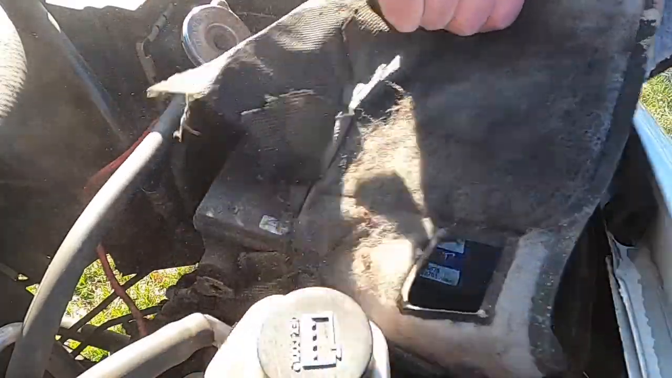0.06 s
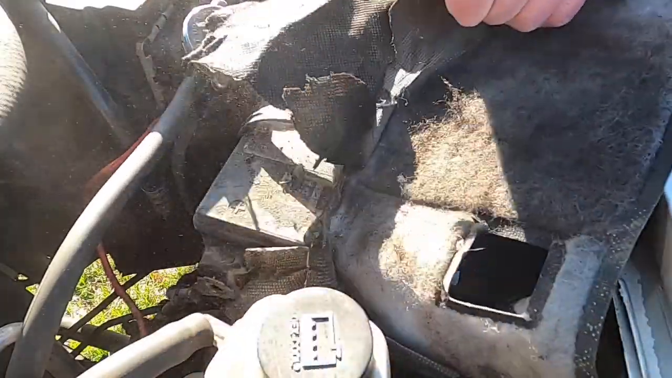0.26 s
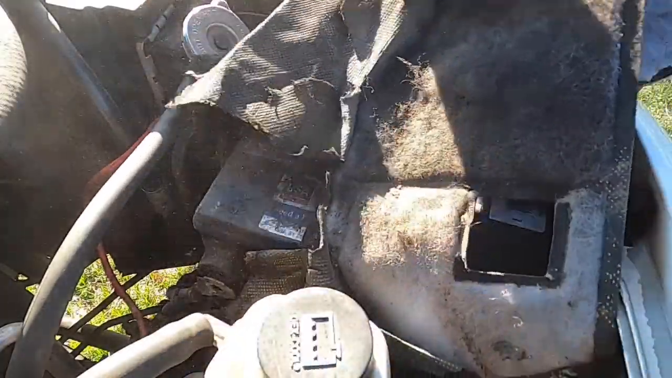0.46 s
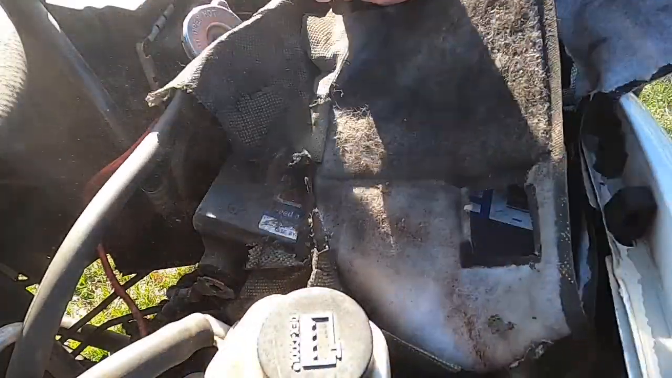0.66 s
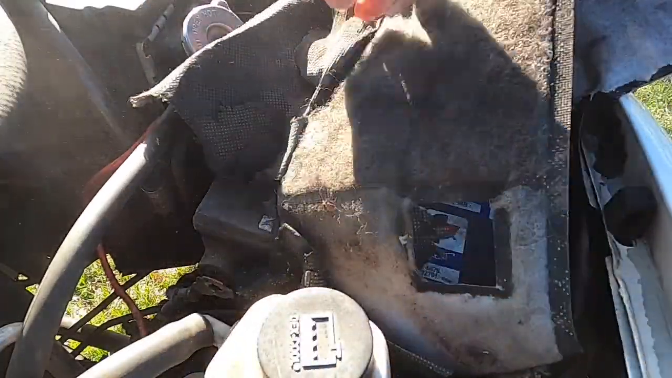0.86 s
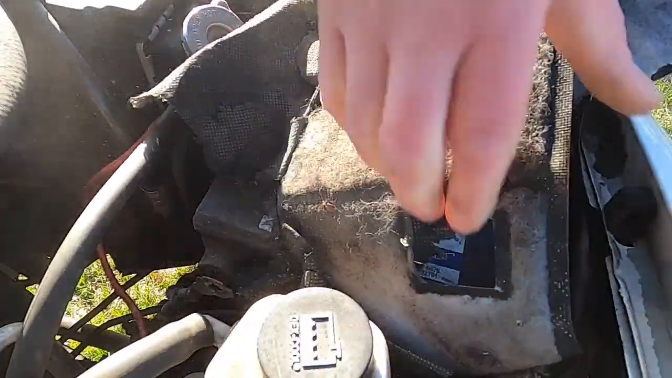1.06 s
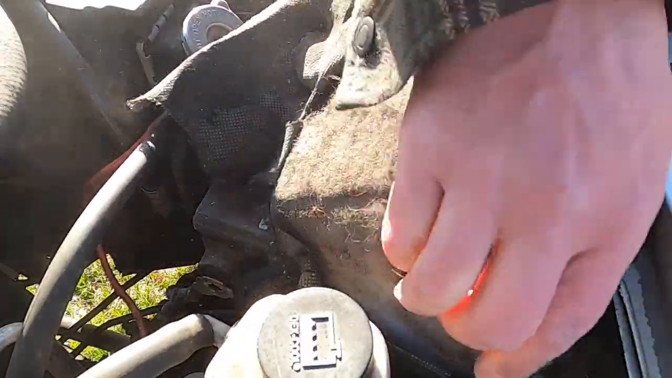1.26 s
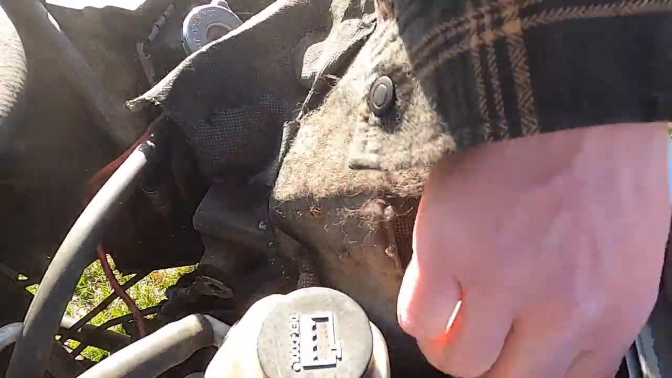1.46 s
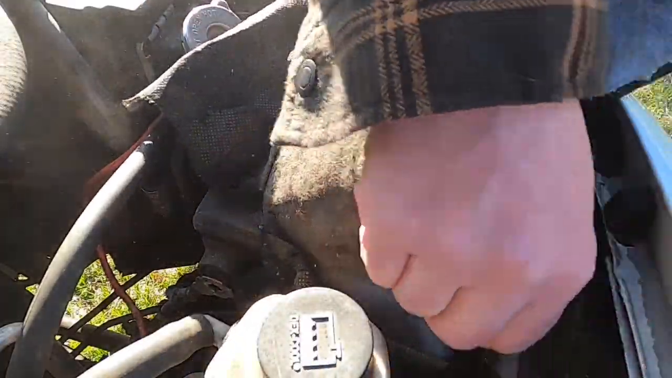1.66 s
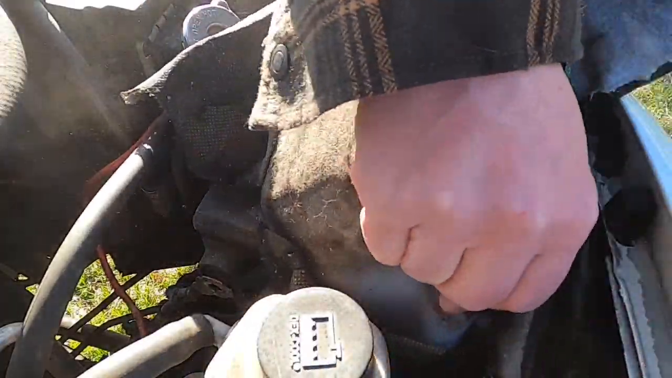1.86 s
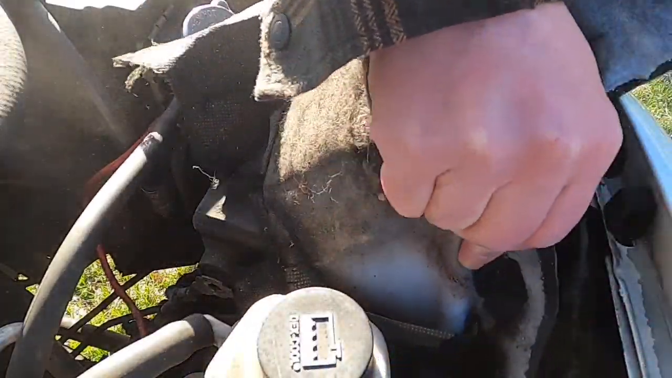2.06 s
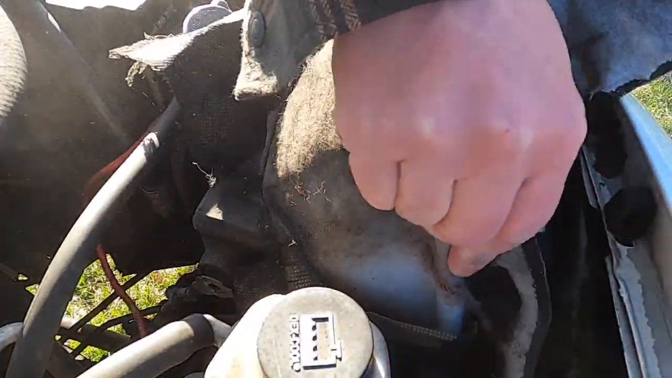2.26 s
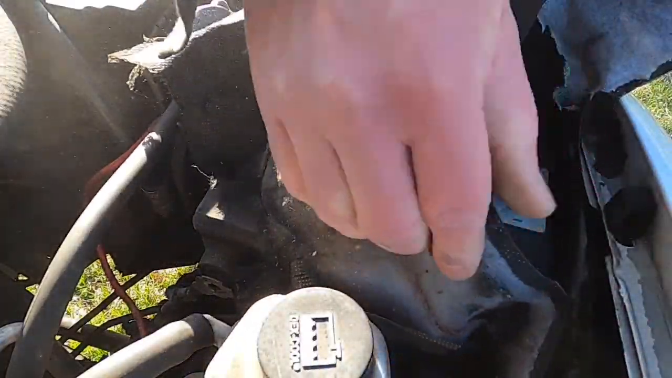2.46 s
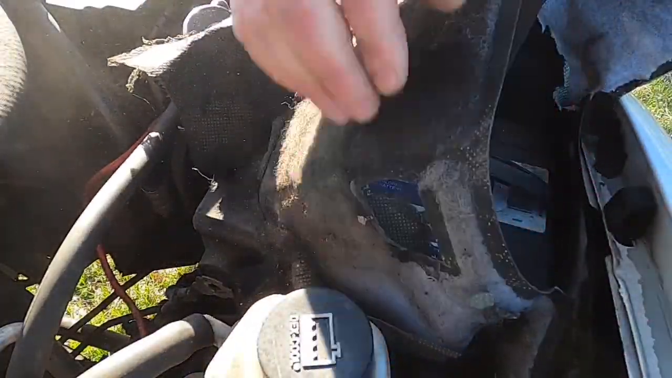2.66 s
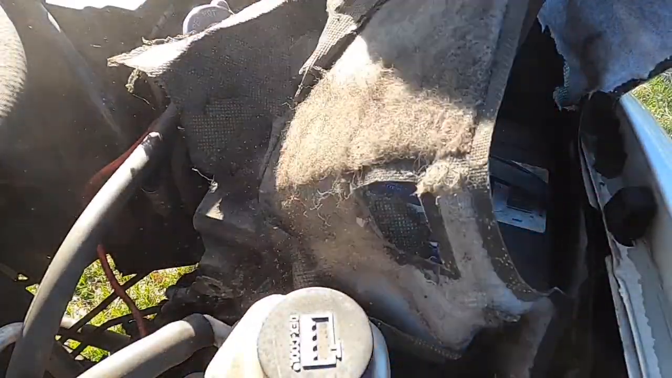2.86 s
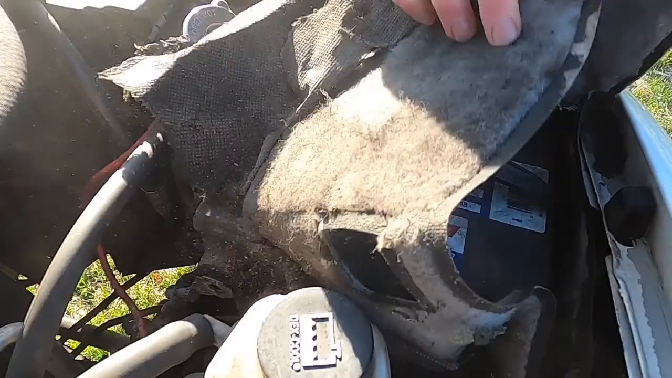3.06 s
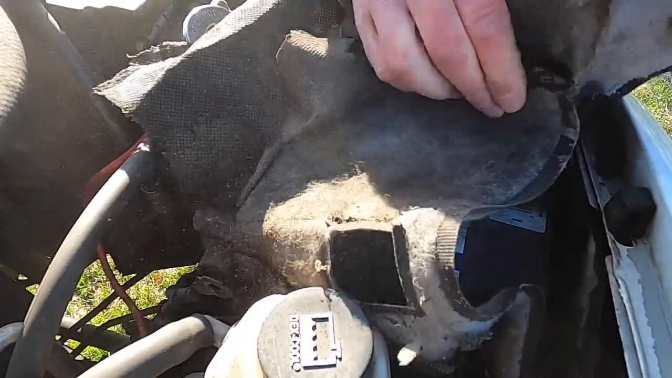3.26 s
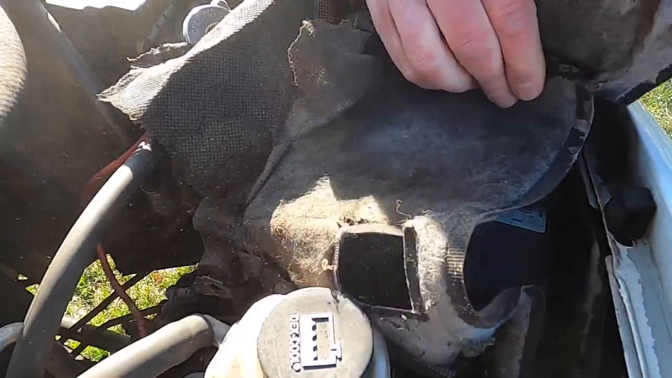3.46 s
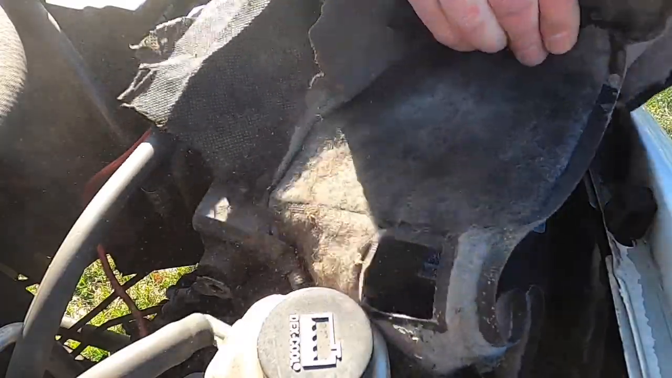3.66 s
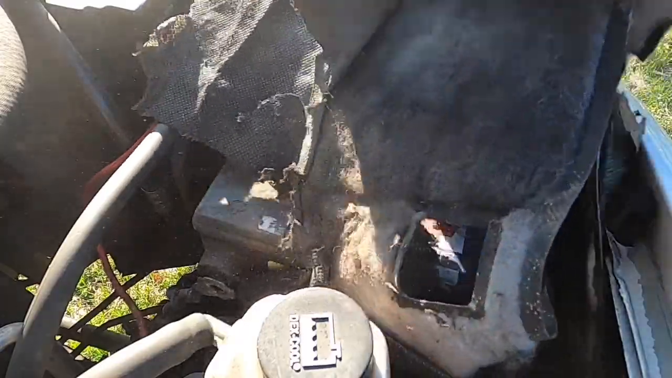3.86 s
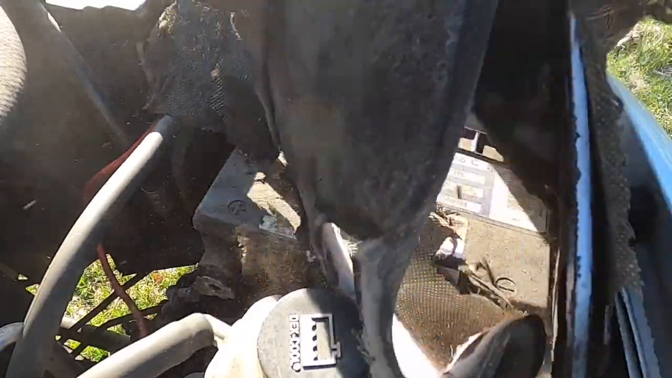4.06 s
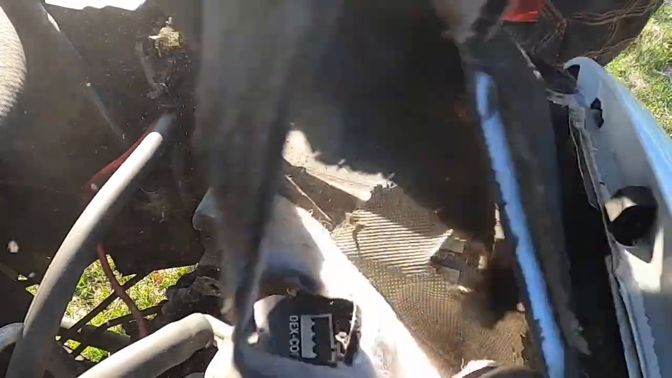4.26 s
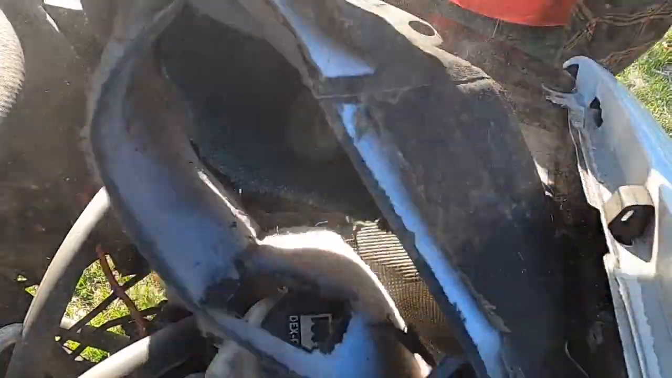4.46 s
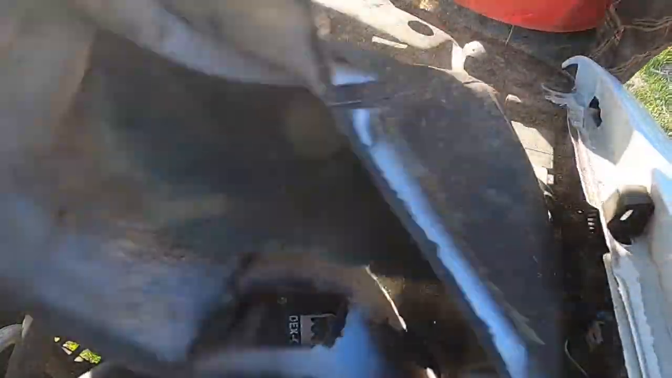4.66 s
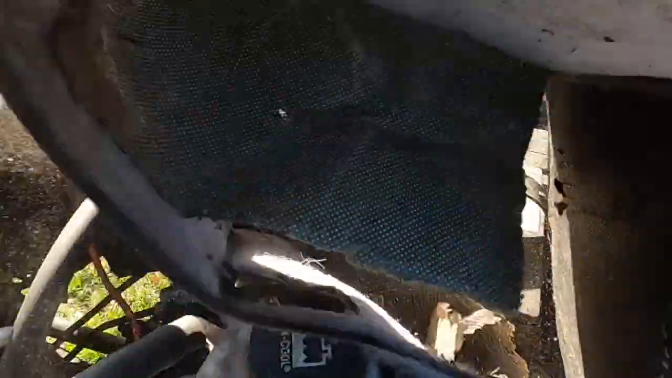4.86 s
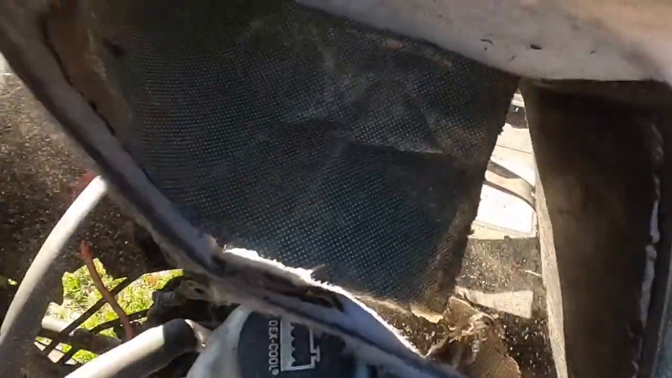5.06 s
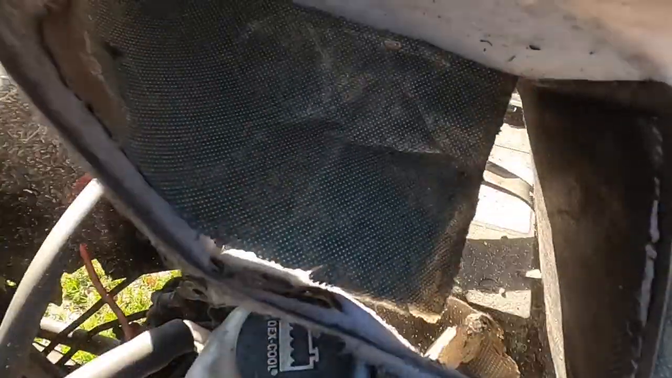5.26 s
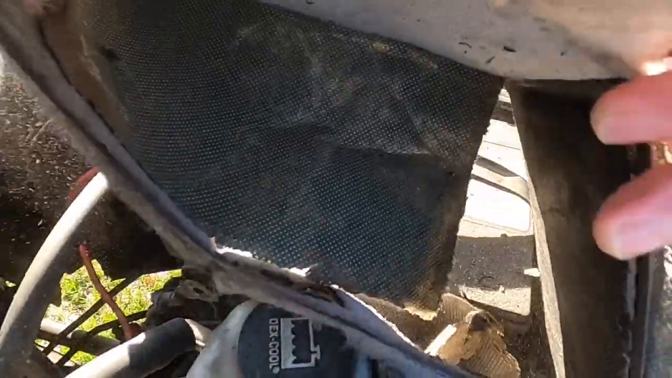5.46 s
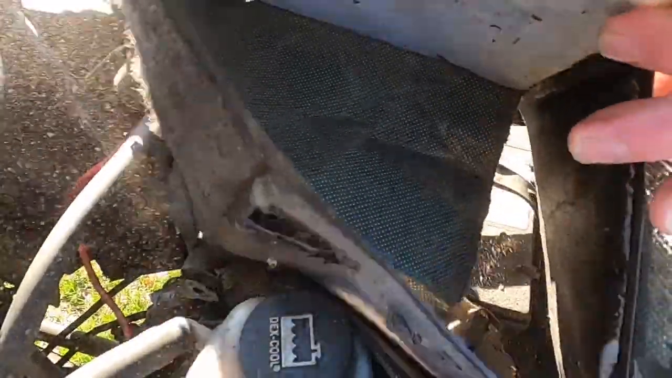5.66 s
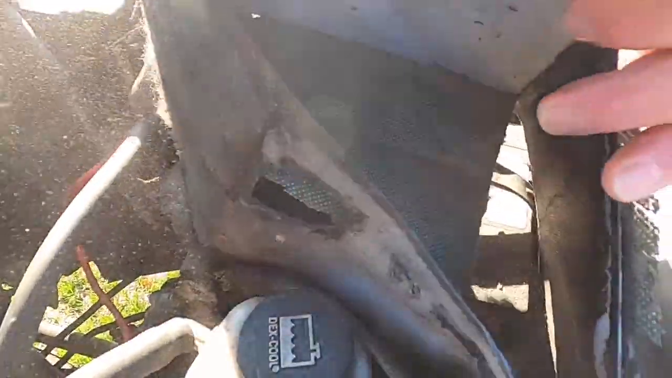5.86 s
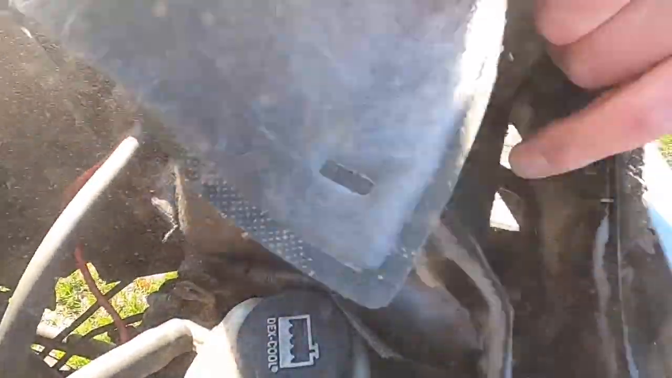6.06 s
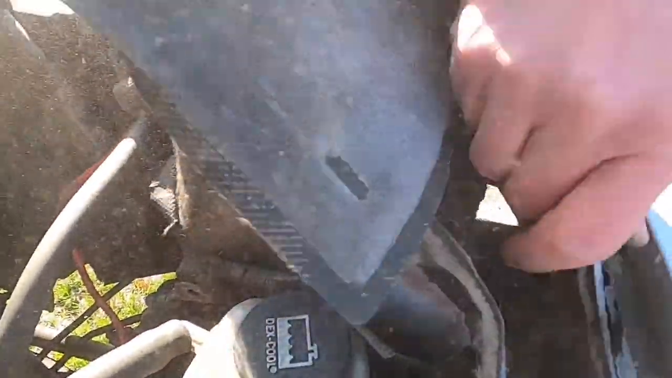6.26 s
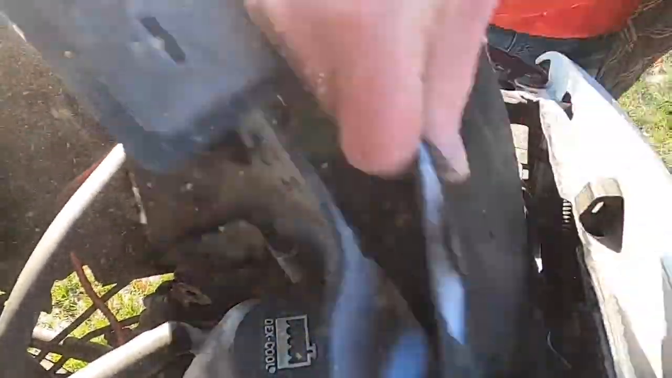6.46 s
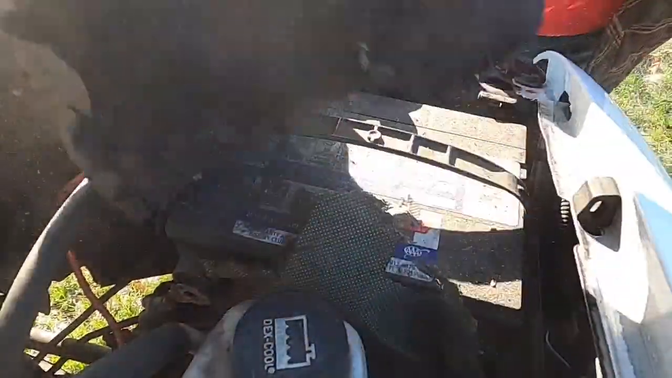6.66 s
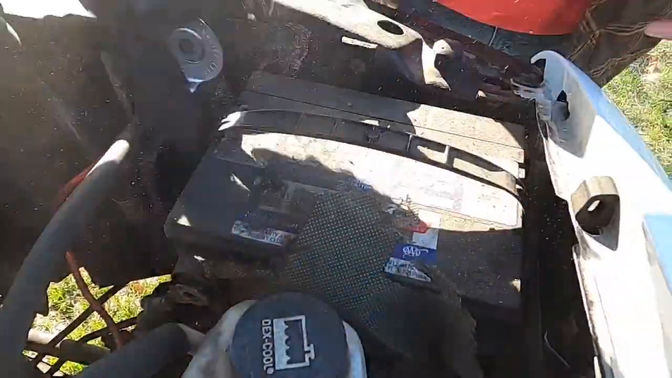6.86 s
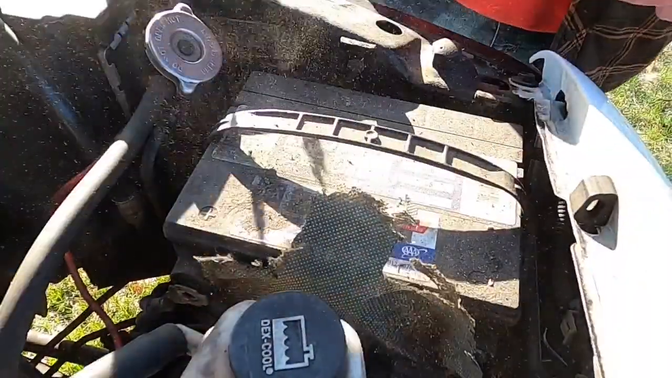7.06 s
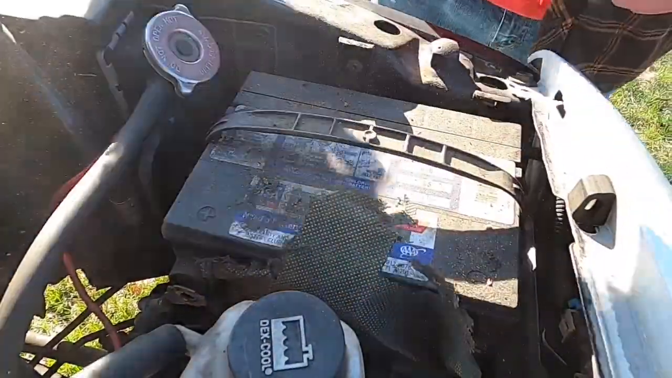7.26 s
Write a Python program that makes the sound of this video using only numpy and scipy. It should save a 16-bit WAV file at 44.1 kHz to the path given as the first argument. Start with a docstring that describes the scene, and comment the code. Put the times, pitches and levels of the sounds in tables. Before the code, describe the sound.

A stiff felt cover is tugged off a car battery by hand, outdoors and close to the microphone. It starts with a dry scrape, a knock and a sharp snap at 0.2 seconds, then uneven rasping with light knocks. From 1 to 3 seconds the rubbing is softer, dotted with snapping threads. A dull knock comes at 3.3 seconds, and around 4 seconds a loud rip with a short creak and more snaps. The loudest moment is near 4.9 seconds: deep thumps jolt the microphone, followed by quick hollow knocks on the battery case and low rumble until about 5.3 seconds. The sound then narrows from stereo to nearly mono. Further scrapes and bumps come around 6.1 seconds, and a last strong rasp at 6.6 ends in a light knock. Faint wind and hiss lie underneath, with a barely audible distant bird whistling near 2.8, 5.3 and 7.3 seconds.

```python
"""Fibres scrape and snap as a stiff felt cover is tugged and torn off a car battery by hand, outdoors.
Stick-slip friction makes the felt rasp and creak and drives the modes of the case; impacts on the case
and on the mount of a small stereo microphone close by add knocks and low pushes. A far bird whistles
over a faint hiss and a little wind. After the loudest knocks, near 5 s, the recorder falls back to
almost one channel."""
import sys
import numpy as np
from scipy import signal
from scipy.io import wavfile

SR = 44100
rng = np.random.default_rng(int(sys.argv[2]) if len(sys.argv) > 2 else 0)


def unload_wav(signal):
    """Save mono or channel-first audio to the path in sys.argv[1] as 16-bit WAV at rate SR, clipped to [-1, 1]."""
    wavfile.write(
        sys.argv[1],
        SR,
        np.round(np.clip(np.atleast_2d(signal).T, -1, 1) * 32767).astype(np.int16),
    )


N = 322371


def amp(db):
    """Amplitude ratio of a level in dB."""
    return 10 ** (np.asarray(db) / 20)


def unit_rms(x):
    """Normalisation to rms 1."""
    return x / np.sqrt(np.mean(x ** 2) + 1e-20)


def in_time(curve):
    """Linear interpolation of a curve at every sample."""
    return np.interp(np.arange(N) / SR, *np.transpose(curve))


def at_hz(spectrum, hz):
    """Interpolation on a logarithmic frequency axis."""
    freqs, values = np.transpose(spectrum)
    return np.interp(np.log(hz), np.log(freqs), values)


def drift(corner_hz):
    """Slow random modulation: low-passed noise of rms 1."""
    r = np.exp(-80 * np.pi * corner_hz / SR)   # one step per 40 samples
    slow = signal.lfilter([1], [1, -2 * r, r * r], rng.standard_normal(N // 40 + 2002))[2000:]
    return np.interp(np.arange(N) / 40, np.arange(len(slow)), unit_rms(slow))


def ring(force, hz, t60):
    """Damped resonator: a unit impulse excites a decaying sine of amplitude 1."""
    r, w = amp(-60 / (t60 * SR)), 2 * np.pi * hz / SR
    return signal.lfilter([0, np.sin(w)], [1, -2 * r * np.cos(w), r * r], force + 1e-18)


# Likeness of the two microphone ports: f/Hz, correlation
CORRELATION = [(30, 0.27), (100, 0.86), (400, 0.97), (1500, 0.73), (4000, 0.96), (8000, 0.19),
               (15000, 0.58)]
# Left port over right: f/Hz, level/dB
IMBALANCE = [(60, 1), (180, -1.5), (550, -2.5), (1650, 0), (4970, -2), (15000, -4)]
def ports(common, opposed, hz):
    """Partial coherence: an in-phase and an antiphase signal near hz mix into left and right."""
    alike, left_db = np.clip(at_hz(CORRELATION, hz), 0, 1), at_hz(IMBALANCE, hz) / 2
    pair = np.sqrt((1 + alike) / 2) * common + np.sqrt((1 - alike) / 2) * opposed * [[1], [-1]]
    return amp([[left_db], [-left_db]]) * pair


def band_noise(spectrum, contact, patchy_db):
    """Amplitude modulation: noise times a contact gain, in fluctuating quarter-octave bands; rms 1."""
    low_hz, top_hz = spectrum[0][0], min(spectrum[-1][0], .45 * SR)
    edges = np.geomspace(low_hz, top_hz, int(np.log2(top_hz / low_hz) * 4) + 2)
    out, together = 0, drift(28)
    white = contact * rng.standard_normal((2, 2, N))
    for k, (low, high) in enumerate(zip(edges, edges[1:])):
        hz = np.sqrt(low * high)
        band = signal.sosfilt(signal.butter(2, [low, high], "band", fs=SR, output="sos"), white[k % 2])
        flicker_db = patchy_db * (.5 * together + drift(13.6))
        out = out + amp(at_hz(spectrum, hz) + flicker_db) * ports(*band, hz)
    return unit_rms(out)


def slips(per_s, spread_db, decay_s):
    """Stick-slip friction as a gain: random, exponentially decaying bursts over a steady rub."""
    sizes = amp(spread_db * np.minimum(rng.exponential(1, N), 4))
    slipping = rng.random(N) < per_s / SR
    r = np.exp(-1 / (decay_s * SR))
    return 1 + signal.lfilter([1], [1, -r], sizes * slipping)


# Pulls of the hand: start of hold t/s, swell/s, hold/s, fade/s, level/dB of fibre, felt, rumble, drone
PULLS = [(0.109, 0.42, 0.15, 0.13, -37, -39, -42.5, -46), (0.422, 0.046, 0.31, 0.061, -44.5, -48, -64, -48),
         (0.859, 0.17, 0.1, 0.045, -42.5, -48, -50, -51), (1.31, 0.1, 0.029, 0.065, -51, -51, -47.5, -62),
         (1.549, 0.027, 0.2, 0.5, -53.5, -54, -53, -68), (2.036, 0.8, 0.2, 0.12, -43, -53.5, -60.5, -57),
         (2.395, 0.057, 0.067, 0.13, -44.5, -50.5, -57, -54),
         (2.639, 0.13, 0.015, 0.076, -48.5, -59.5, -53.5, -66),
         (3.08, 0.14, 0.12, 0.75, -47.5, -59, -52.5, -53.5),
         (3.236, 0.22, 0.17, 0.2, -43, -44.5, -40.5, -56),
         (3.598, 0.16, 0.22, 0.067, -42.5, -46.5, -54.5, -50),
         (3.895, 0.1, 0.2, 0.04, -28, -30.5, -29, -33.5),
         (4.12, 0.059, 0.045, 0.089, -46.5, -45.5, -34.5, -44),
         (4.307, 0.08, 0.2, 0.38, -50, -51, -50, -56.5), (4.651, 0.13, 0.02, 0.11, -41.5, -46, -45, -71.5),
         (4.812, 0.62, 0.014, 0.33, -42, -54, -44.5, -62.5),
         (4.868, 0.068, 0.014, 0.038, -31.5, -39, -25, -31.5),
         (4.947, .1, 0.024, 0.48, -57.5, -50.5, -34, -35.5),
         (5.049, 0.11, 0.27, 0.03, -82.5, -68.5, -27.5, -57),
         (5.512, 0.04, 0.029, 0.066, -62, -67, -49.5, -64),
         (5.629, .02, 0.19, 0.25, -52.5, -57.5, -43, -58.5),
         (5.997, 0.087, 0.1, 0.16, -45.5, -42.5, -39, -46), (6.158, 0.13, 0.074, 0.054, -49, -50, -44, -42),
         (6.343, 0.17, 0.13, 0.12, -54.5, -55.5, -53, -55.5),
         (6.561, 0.13, 0.086, 0.012, -34.5, -44.5, -44, -36.5),
         (6.656, 0.087, 0.063, 0.19, -48, -52, -42, -42.5),
         (6.908, 0.082, 0.17, 0.021, -65.5, -75.5, -61.5, -74.5)]
# Bulge in the middle of a hold: level/dB of fibre, felt, rumble, drone
BULGE = (3.38, 5.1, 1.7, 4.4)
def tugs():
    """Incoherent sources add in power: overlapping tugs give the gains of the four rubbing sounds."""
    t, power = np.arange(0, N + 64, 64) / SR, 0
    for s, swell_s, hold_s, fade_s, *levels_db in PULLS:
        drop_db = 20 * (np.maximum(s - t, 0) / swell_s + np.maximum(t - s - hold_s, 0) / fade_s)
        arch = np.sin(np.pi * np.clip((t - s) / hold_s, 0, 1))
        power = power + (amp(levels_db)[:, None] * amp(np.outer(BULGE, arch) - drop_db)) ** 2
    return [np.interp(np.arange(N) / SR, t, np.sqrt(p)) for p in power]


# Spectral density of scraping fibres: f/Hz, relative level/dB
FIBRE_SPECTRUM = [(600, -15.5), (850, -1), (1120, 1.5), (2500, 0.5), (4100, 0.5), (5000, -4), (6500, -7.5),
                  (8500, -15), (12000, -22), (15900, -30.5)]
def fibre_scrape():
    """Friction noise: brief slips of the fibres make a bright rasp."""
    return band_noise(FIBRE_SPECTRUM, slips(110, spread_db=1.7, decay_s=.0012), patchy_db=1.2)


# Spectral density of felt on the case: f/Hz, relative level/dB
FELT_SPECTRUM = [(94, -23), (160, -4.5), (280, -5), (333, -9), (659, -9), (1600, -20.5), (2080, -41)]
def felt_rub():
    """Friction noise: denser, longer slips of felt on the case make a dull rub."""
    return band_noise(FELT_SPECTRUM, slips(200, spread_db=1.5, decay_s=.003), patchy_db=1.5)


# Spectral density of the handling rumble: f/Hz, relative level/dB
RUMBLE_SPECTRUM = [(12, -18.5), (30, -6), (83, 2.5), (200, -6.5), (340, -20.5)]
def hand_rumble():
    """Handling noise: the tugs make a low, strongly fluctuating rumble."""
    return band_noise(RUMBLE_SPECTRUM, contact=1, patchy_db=6)


# Modes of the battery case: f/Hz, relative level/dB, T60/s
CASE_MODES = [(182, -21.5, 0.071), (225, -10.5, 0.15), (355, 3, 0.055), (422, 8.5, 0.024),
              (507, 4.5, 0.023), (710, -1.5, 0.088), (826, 0.5, 0.11), (983, -2.5, 0.08), (1133, -4, 0.071)]
def case_drone():
    """Forced vibration: rough rubbing sustains the low modes of the case, each swelling alone."""
    rub = slips(60, spread_db=2.5, decay_s=.018) * rng.standard_normal((2, N))
    return unit_rms(sum(amp(db + 2 * drift(4.6)) * ports(*ring(rub, hz, t60), hz) / np.sqrt(t60)
                        for hz, db, t60 in CASE_MODES if hz < 600))


# Spectral density of the outdoor hiss: f/Hz, relative level/dB
HISS_SPECTRUM = [(170, 15), (250, 0.5), (450, -1.5), (830, -12.5), (1170, 2.5), (1500, -4.5), (3000, -5.5),
                 (8500, -14), (9500, -24.5), (15500, -40)]
# Course of the hiss: t/s, level/dB
HISS_LEVEL = [(0, -60), (4.9, -70), (5.15, -69), (5.6, -59.5), (6.9, -59), (7.1, -75)]
def air_hiss():
    """Masking: a faint broadband background emerges in the pauses."""
    return amp(in_time(HISS_LEVEL)) * band_noise(HISS_SPECTRUM, contact=1, patchy_db=1.5)


# Threads and seams that let go: t/s, peak level/dB, centre f/Hz, T60/s
BREAKS = [(0.033, -16, 4200, 0.016), (0.2126, -9.5, 3720, 0.022), (0.6395, -19.5, 3170, 0.089),
          (0.958, -24.5, 3720, 0.009), (1.0904, -38, 2640, 0.044), (1.283, -27.5, 4500, 0.0083),
          (1.313, -41, 2900, 0.053), (1.327, -43, 2500, 0.017), (1.394, -37, 2950, 0.064),
          (1.411, -34, 3800, 0.016), (1.5288, -41, 1840, 0.043), (1.768, -27.5, 3180, 0.12),
          (1.8336, -29.5, 4970, 0.029), (2.0522, -31, 1900, 0.035), (2.097, -21, 4500, .012),
          (2.121, -20.5, 4400, 0.12), (2.1372, -15, 4560, 0.012), (2.225, -27, 3640, 0.018),
          (2.703, -39.5, 2720, 0.034), (2.7697, -45, 3570, 0.02), (3.146, -23.5, 3960, 0.02),
          (3.25, -21.5, 3400, 0.033), (3.327, -22, 3560, 0.016), (3.8579, -13, 3380, 0.018),
          (4.1214, -12.5, 4730, 0.03), (4.311, -25, 3200, 0.12), (4.324, -24, 3200, 0.08),
          (4.339, -17, 2300, 0.057), (4.5025, -24.5, 2940, 0.094), (4.904, -13, 2480, 0.023),
          (5.0128, -25, 2980, 0.033), (5.113, -26, 4400, 0.048), (5.1826, -31.5, 2300, 0.021),
          (5.228, -41, 2600, 0.014), (5.2783, -30, 2400, 0.027), (5.349, -42.5, 2500, 0.043),
          (5.64, -35.5, 1780, .03), (6.11, -29.5, 2770, 0.051), (6.217, -30, 3280, 0.019),
          (6.785, -32.5, 2620, 0.037), (6.992, -40.5, 2280, 0.027)]
def snaps():
    """Sudden release of tension: a tick and a dying noise burst briefly ring the stiff backing."""
    n = 4000
    out, t = np.zeros((2, N + n)), np.arange(n) / SR
    noise = rng.standard_normal((len(BREAKS), 2, n))
    mode_octaves = .8 * rng.uniform(-.33, 1, (len(BREAKS), 4))
    tick = 6 * (t == 0) * [[1], [0]]
    for (s, db, hz, t60), burst, octaves in zip(BREAKS, noise, mode_octaves):
        band = signal.butter(3, [hz * .26, min(hz * 1.92, 9000)], "band", fs=SR, output="sos")
        crack = signal.sosfilt(band, burst * amp(-60 * t / t60) + tick)
        backing = sum(ring(crack, hz * 2 ** octave, t60=.01) for octave in octaves)
        snap = ports(*(crack + amp(-33) * backing), hz)
        out[:, round(s * SR):][:, :n] += amp(db) * snap / np.abs(snap).max()
    return out[:, :N]


def mount_push(t, db):
    """Structure-borne sound: a low, damped swing sags in pitch and reaches the ports out of phase."""
    rest_hz, extra_hz, sag_s, t60, delay_s = 38.6, 112.3, .0065, .061, .0027
    age = np.maximum(t - delay_s, 0)
    phase = 2 * np.pi * (rest_hz * age + extra_hz * sag_s * (1 - np.exp(-age / sag_s)))
    lead_rad = np.array([[.5], [-.5]]) * np.minimum(rest_hz * age * 4, 1)
    return -amp(db - 60 * age / t60) * np.sin(phase + lead_rad) * amp([[1.5], [-1.5]])


# Blows on case and mount: t/s, case peak level/dB, push level/dB, hardness/(dB per octave)
BLOWS = [(0.1, -18, -52, 0), (0.214, -35, -21.5, -9), (0.747, -25, -31.5, -9), (0.961, -26, -47, -11),
         (1.426, -35.5, -64, -7.5), (1.831, -29, -43, -16), (2.906, -49, -68, -6),
         (3.29, -17.5, -24.5, -11.5), (3.856, -18, -27, 28), (3.881, -17, -36, -9), (4.795, -49, -19.5, -5),
         (4.881, -49, -8, 3.5), (4.903, -7.5, -2, -10), (4.947, -12, -39, 1), (5.011, -11, -24, 6),
         (5.023, -11.5, -36, 1.5), (5.055, -16, -24, -15), (5.112, -15, -26, 2), (5.184, -20.5, -13, -4),
         (5.216, -25.5, -24, 4), (5.639, -37, -42, -6), (5.793, -34, -42, -2), (5.819, -33, -45, -2),
         (6.121, -27, -29, -6), (6.188, -25, -19.5, -17), (6.216, -24, -85, -7), (6.779, -26.5, -32.5, 3.5)]
def knocks():
    """Impact excitation: each blow rattles the case modes and pushes the mount; harder is brighter."""
    n, grip = 8000, .5   # the felt shortens the ring of the case to this share
    out, t = np.zeros((2, N + n)), np.arange(n) / SR
    rattle = rng.standard_normal((len(BLOWS), 2, n)) * (np.exp(-t / .0046) + .26 * np.exp(-t / .018))
    scatter_db = 2 * rng.standard_normal((len(BLOWS), len(CASE_MODES)))
    detune = 1 + .035 * rng.standard_normal(scatter_db.shape)   # the grip bends the pitches
    contacts = signal.sosfilt(signal.butter(2, 1500, fs=SR, output="sos"), rattle)   # felt cushioning
    for k, (s, db, push_db, hardness) in enumerate(BLOWS):
        body = 0
        for (hz, mode_db, t60), chance_db, bend in zip(CASE_MODES, scatter_db[k], detune[k]):
            gain = amp(mode_db + chance_db + hardness * np.log2(hz / 500))
            body = body + gain * ports(*ring(contacts[k], hz * bend, t60 * grip), hz)
        out[:, round(s * SR):][:, :n] += amp(db) * body / np.abs(body).max() + mount_push(t, push_db)
    return out[:, :N]


# Spectral density of wind on the ports: f/Hz, relative level/dB
WIND_SPECTRUM = [(12, -5.5), (30, -4), (60, -10.5), (260, -27.5)]
# Course of the wind: t/s, level/dB
WIND_LEVEL = [(0, -75), (1.0, -56), (2.7, -57), (3.1, -45.5), (3.7, -52), (6.7, -51), (7.0, -59.5)]
def wind():
    """Flow noise: air moving over the ports makes a low flutter."""
    return amp(in_time(WIND_LEVEL)) * band_noise(WIND_SPECTRUM, contact=1, patchy_db=1)


# Whistles of a far bird: t/s, duration/s, rms level/dB
CALLS = [(2.83, .135, -69), (5.29, .085, -70), (7.27, .135, -66)]
def bird():
    """Frequency glide: each whistle is a pure tone that slides up and levels off."""
    from_hz, to_hz, rise_s, fade_s = 2340, 2710, .038, .012
    out, t = np.zeros(N), np.arange(N) / SR
    for s, length_s, db in CALLS:
        hz = to_hz + (from_hz - to_hz) * np.exp(-np.maximum(t - s, 0) / rise_s)
        gate = np.clip(np.minimum(t - s, s + length_s - t) / fade_s + 1, 0, 1)
        out += np.sqrt(2) * gate * amp(db) * np.sin(2 * np.pi * np.cumsum(hz) / SR)
    return out


# Creaks of stretched felt: t/s, duration/s, start f/Hz, end f/Hz, level/dB
FELT_CREAKS = [(3.947, 0.043, 305, 442, -19.5), (4.337, 0.011, 1310, 1370, -29.5),
               (5.182, .15, 403, 277.7, -35), (6.046, 0.049, 1310, 1320, -39.5)]
def creaks():
    """Stick-slip oscillation: fast slips fuse into a gliding tone of uneven amplitude and phase."""
    roughness, rise_share = .9, .3
    out, noises = np.zeros((2, N)), rng.standard_normal((len(FELT_CREAKS), 2, 9000))
    for (s, length_s, from_hz, to_hz, db), noise in zip(FELT_CREAKS, noises):
        n = round(length_s * SR)
        lowpass = signal.butter(2, from_hz / 10, fs=SR, output="sos")
        wander = signal.sosfilt(lowpass, noise[0] + 1j * noise[1])[-n:]
        phase = 2 * np.pi * np.cumsum(np.linspace(from_hz, to_hz, n)) / SR
        tone = np.exp(1j * phase) * (1 + roughness * wander / np.std(wander))
        envelope = np.sin(np.pi / 2 * np.interp(np.arange(n) / n, [0, rise_share, 1], [0, 1, 0]))
        out[:, round(s * SR):][:, :n] += amp(db) * envelope * ports(tone.real, tone.imag, from_hz)
    return out


# Swing of the cover past the microphone: t/s, left over right level/dB
SWING = [(4.2, 0.5), (4.9, 0), (5.0, -6), (5.4, 0.5)]
def scene():
    """Superposition: the sounds of the moving cover add to those of the outdoors."""
    fibre_gain, felt_gain, rumble_gain, drone_gain = tugs()
    friction = fibre_gain * fibre_scrape() + felt_gain * felt_rub()
    handling = rumble_gain * hand_rumble() + drone_gain * case_drone()
    outdoors = wind() + air_hiss() + bird()
    cover = friction + handling + snaps() + knocks() + creaks()
    return cover * amp(in_time(SWING) * [[.5], [-.5]]) + outdoors


# Stereo width of the recorder: t/s, level/dB of the left-right difference (capped at 0)
STEREO_WIDTH = [(0, 11), (5.2, -1.5), (5.45, -12), (7.31, -97.5)]
def record(dry):
    """Transduction: the ports resonate, the left lags, the image narrows, peaks round, the top is cut."""
    port_hz, port_q, port_db, lag_samples, cutoff_hz = 8150, 11.7, -2, 2, 15800
    left, right = dry + amp(port_db) * signal.lfilter(*signal.iirpeak(port_hz, port_q, fs=SR), dry)
    left = np.concatenate([np.zeros(lag_samples), left[:-lag_samples]])
    width = np.minimum(amp(in_time(STEREO_WIDTH)), 1)
    difference = (left - right) / 2
    mid = (left + right) / 2 + np.sqrt(1 - width ** 2) * difference   # narrows onto the left port
    side = difference * width
    rounded = .8 * np.tanh(np.array([mid + side, mid - side]) / .8)
    return signal.sosfilt(signal.cheby2(12, 70, cutoff_hz * 1.03, fs=SR, output="sos"), rounded)


dry = scene()
out = record(dry)
unload_wav(out)
```